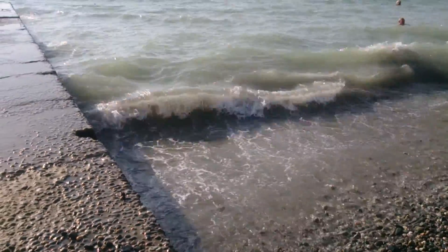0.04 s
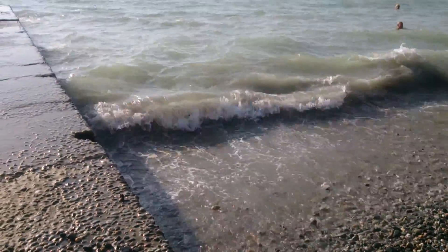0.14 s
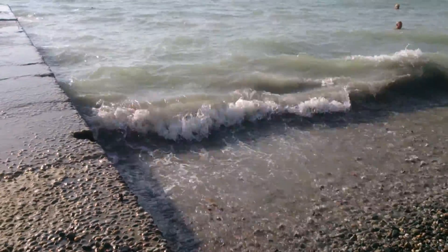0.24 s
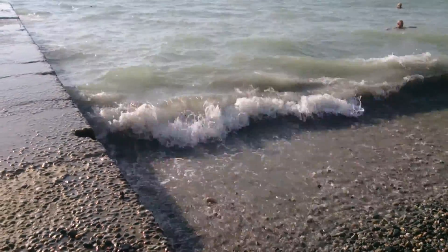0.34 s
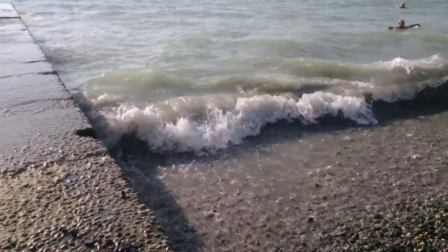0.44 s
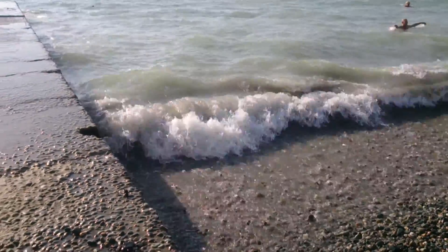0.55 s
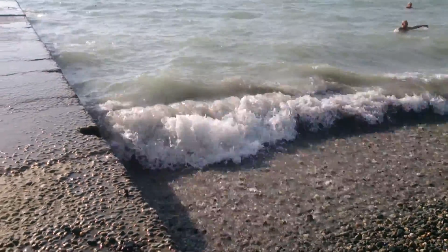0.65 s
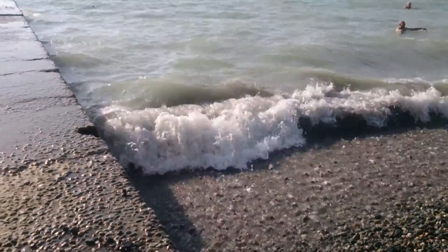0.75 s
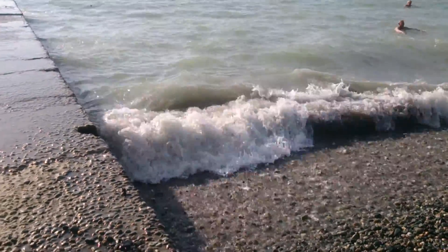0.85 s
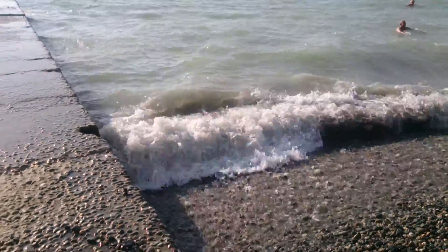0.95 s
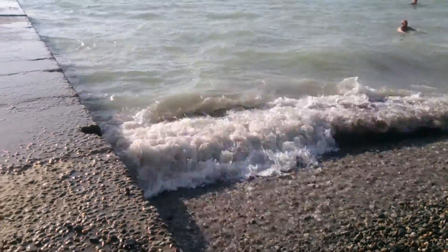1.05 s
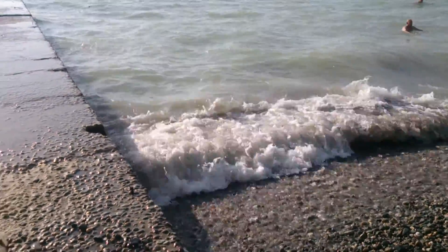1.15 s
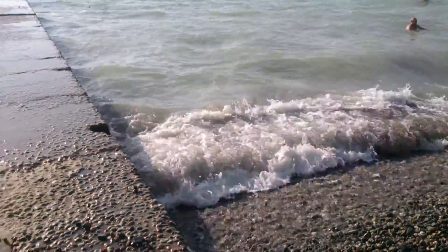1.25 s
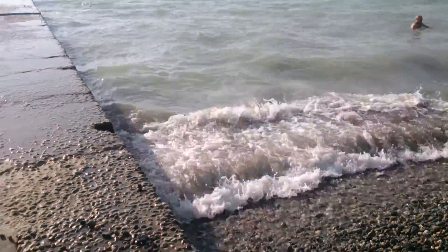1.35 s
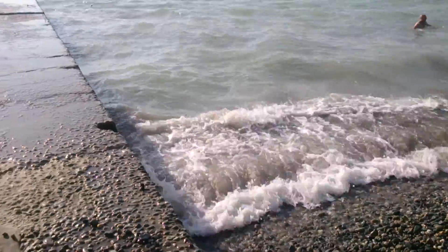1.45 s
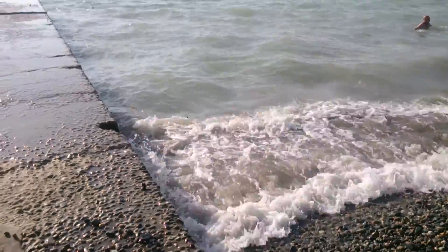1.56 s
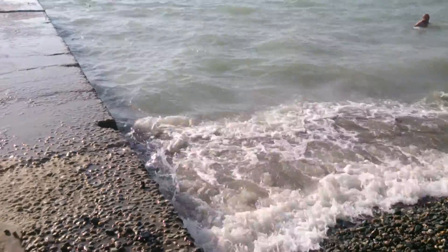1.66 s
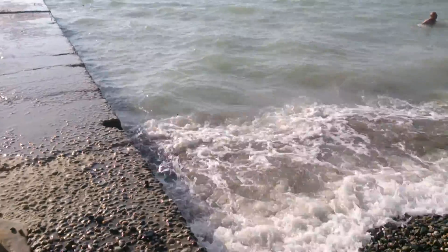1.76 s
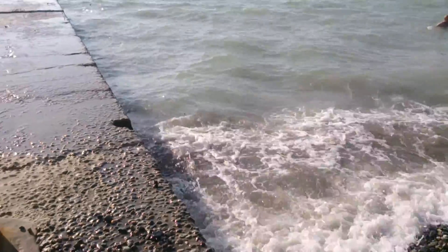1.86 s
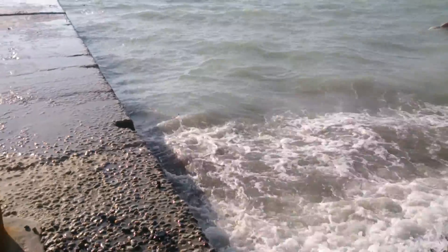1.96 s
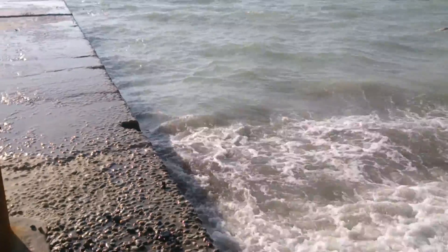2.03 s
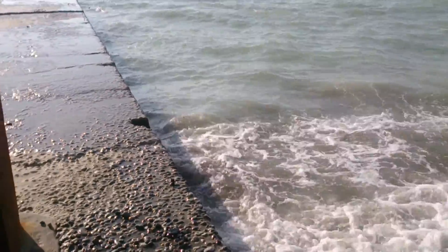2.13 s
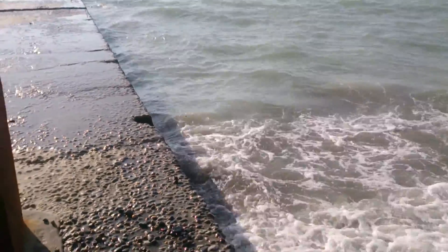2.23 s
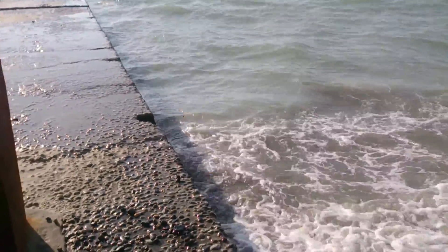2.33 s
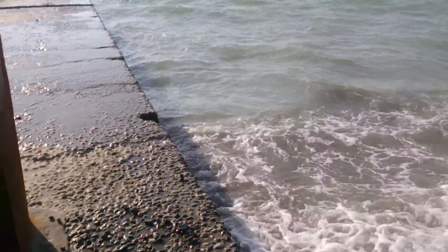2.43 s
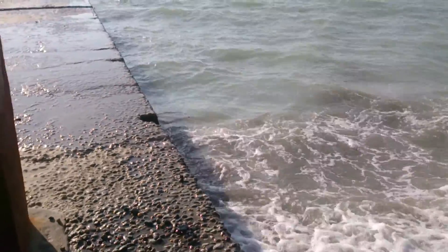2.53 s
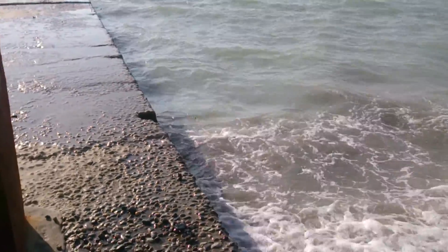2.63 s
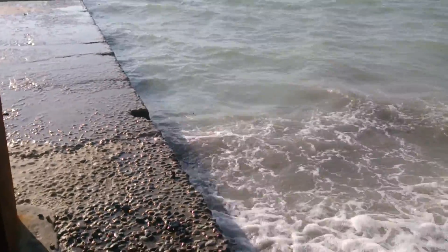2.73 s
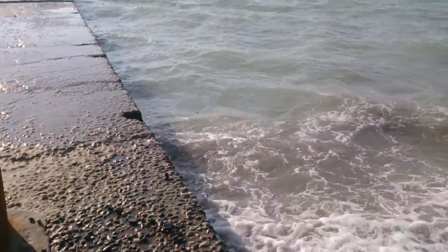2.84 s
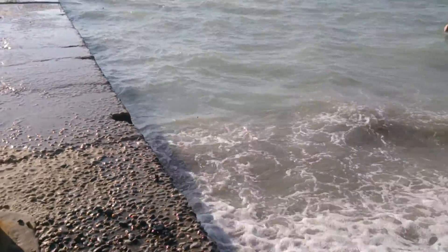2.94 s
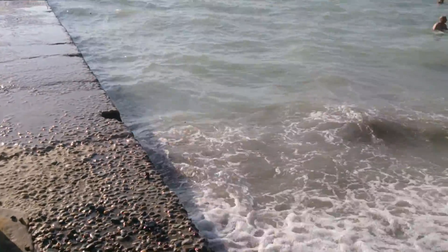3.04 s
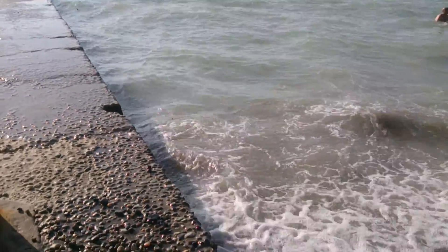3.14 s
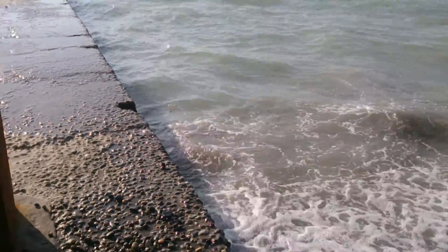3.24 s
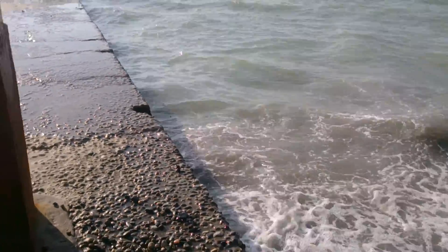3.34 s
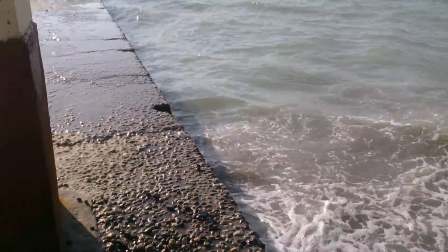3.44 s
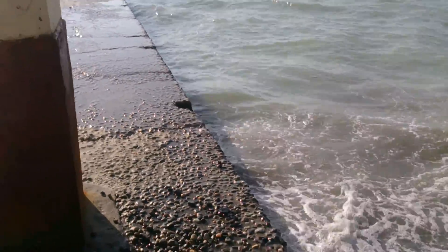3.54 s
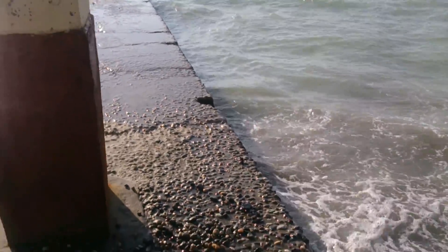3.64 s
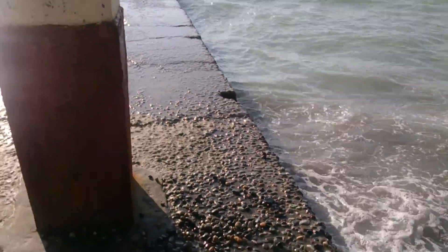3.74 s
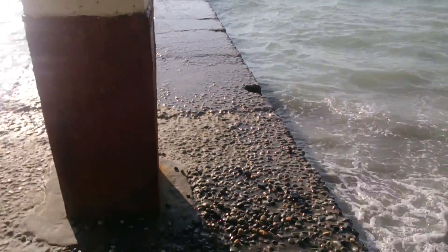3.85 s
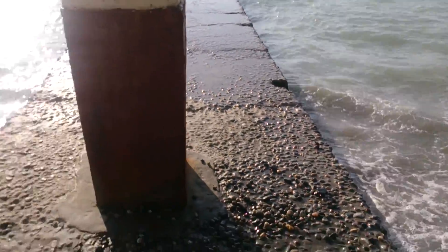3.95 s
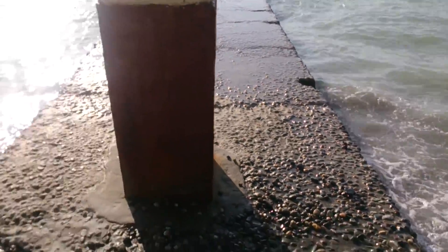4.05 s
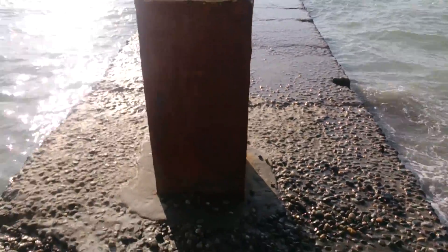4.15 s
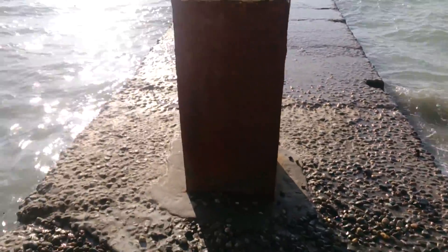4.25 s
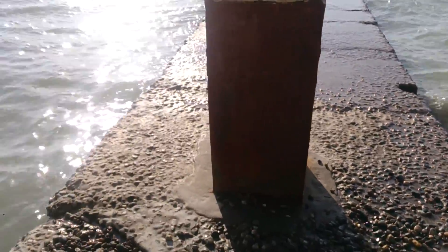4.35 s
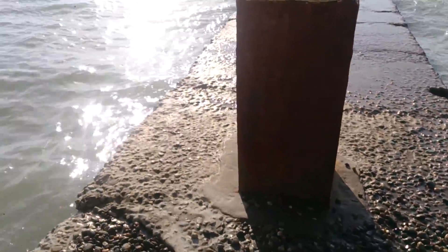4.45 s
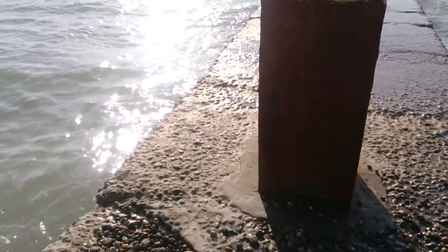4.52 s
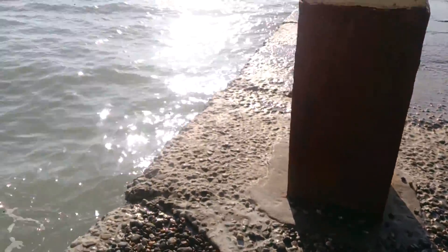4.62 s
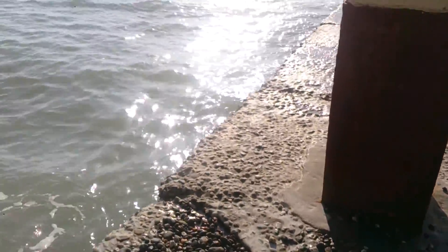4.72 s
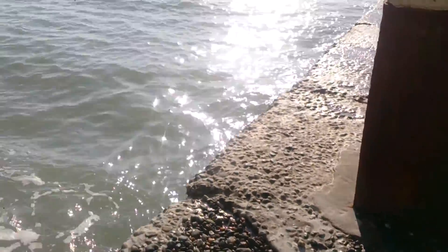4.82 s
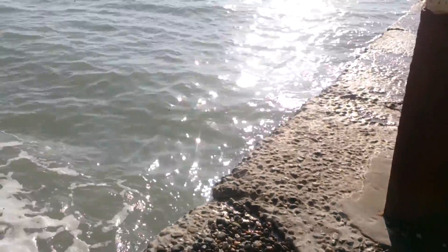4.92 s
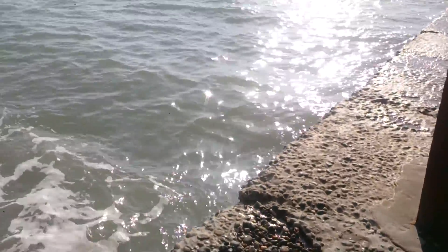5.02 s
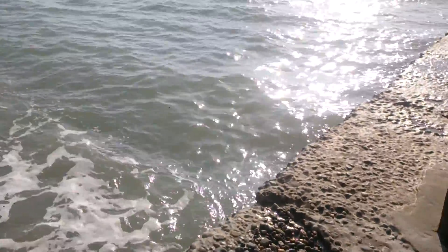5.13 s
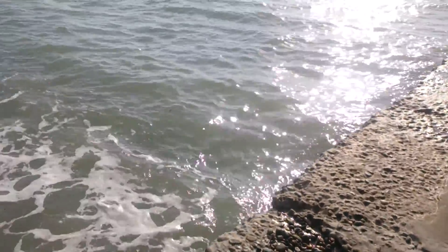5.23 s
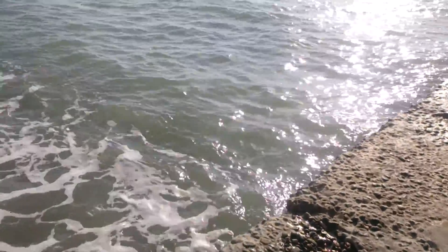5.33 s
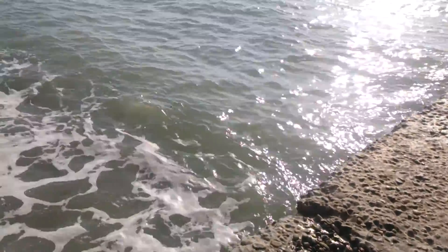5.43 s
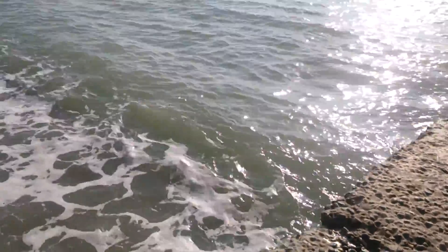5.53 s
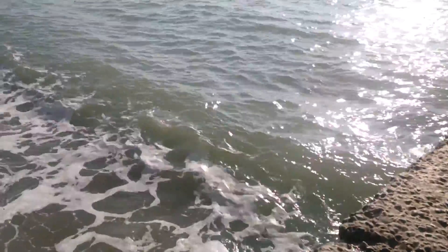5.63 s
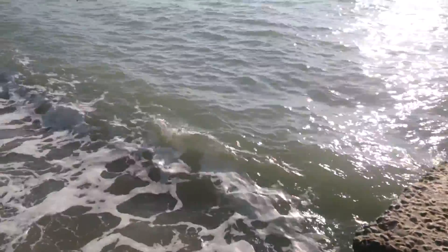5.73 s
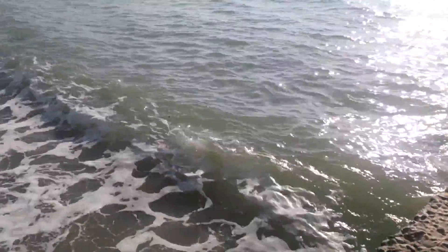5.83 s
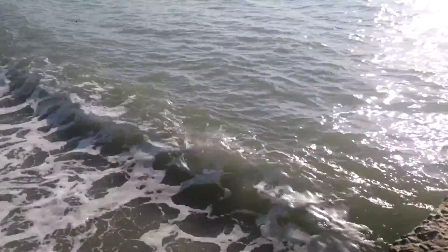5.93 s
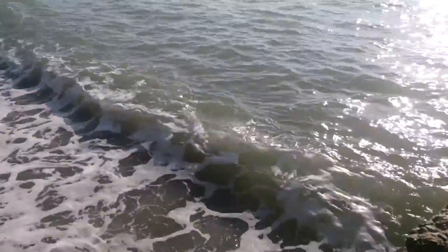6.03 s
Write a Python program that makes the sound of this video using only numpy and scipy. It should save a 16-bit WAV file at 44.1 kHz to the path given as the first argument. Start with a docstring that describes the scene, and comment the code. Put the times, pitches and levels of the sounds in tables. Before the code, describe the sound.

A pebble shore beside a concrete pier, outdoors, in close stereo with wind striking the microphone. From the start a wave rushes in, with low wind thumps in the first 0.3 seconds. Spray patters around 0.8; the falling crest booms dully near 1.2, while white water, grinding shingle and crisp foam stay dense until about 2. Short laps wash up at 2.3 and 2.7, with a brief slackening between. The surf thins to soft fizz and wind rumble. From 3 stones trickle back, and the draining water drags shingle most strongly around 4.0 to 4.2. After 4.4 another wave stirs pebbles; big cobbles rattle evenly from about 5, turning finer and higher after 5.5. A squall hits near 5.05, with fluttering rumble and rapid heavy thumps until 5.4, more buffets and drops around 5.7 to 6.

```python
"""A breaking wave is already rushing up a pebble beach beside a concrete pier, in fizzing foam and gusty wind.
Spray patters on the slab, the backwash drags shingle, then a wave beyond the pier rattles cobbles in a squall.
Water and stones are hails of tiny impacts, coloured and shaped by swells; each grain reaches the two
microphone ports with its own lag. Foam and spray are separate hails on each port.
Wind is coloured noise that follows a pressure curve, with single-eddy pulses that thump on a port."""
import sys
import numpy as np
from scipy import signal
from scipy.fft import rfft, irfft, next_fast_len
from scipy.io import wavfile

SR = 44100
rng = np.random.default_rng(int(sys.argv[2]) if len(sys.argv) > 2 else 0)


def persist_wave(psi):
    """Save psi, clipped to +-1, as 16-bit WAV."""
    counts = np.round(np.clip(psi, -1, 1) * 32767).astype(np.int16)
    wavfile.write(sys.argv[1], SR, np.atleast_2d(counts).T)


N = 268128
TIME = np.arange(N) / SR
SIZE = next_fast_len(N, real=True)
FREQS = np.maximum(np.arange(SIZE // 2 + 1) * SR / SIZE, 1)
SIDES = np.array([[1], [-1]])  # left, right: times half a pan in dB


def undb(db):
    """Decibels to gain."""
    return 10 ** (np.asarray(db) / 20)


def unit(x):
    """Scale to rms 1."""
    return x / np.sqrt(np.mean(x ** 2))


def curves(table):
    """The columns of a table, joined by straight lines in time."""
    s, *columns = np.transpose(table)
    return [np.interp(TIME, s, column) for column in columns]


def response(points):
    """Gain at every frequency from points of f/Hz, level/dB."""
    hz, db = np.transpose(points)
    return undb(np.interp(np.log(FREQS), np.log(hz), db))


def colour(x, points):
    """Give x a spectrum that falls 12 dB an octave past its end points; rms 1."""
    low_hz, high_hz = points[0][0], points[-1][0]
    skirts = np.minimum(1, np.minimum(FREQS / low_hz, high_hz / FREQS)) ** 2
    spectrum = rfft(x, SIZE) * response(points) * skirts
    return unit(irfft(spectrum, SIZE)[:, :N])


def walk(rate):
    """Random curve that takes a new value rate times a second, joined by straight lines; rms 1."""
    steps = rng.uniform(-1, 1, 4096)
    return unit(np.interp(TIME * rate, np.arange(len(steps)), steps))


def swell(full_s, db, attack_s, hold_s, release_s):
    """Gain of a body of water or air that gathers, holds its strength and dies away."""
    early = np.maximum(full_s - TIME, 0)
    late = np.maximum(TIME - full_s - hold_s, 0)
    return undb(db) * np.exp(-early / attack_s - late / release_s)


def puff(s, half_s, db):
    """Gain of a short, rounded surge."""
    return undb(db) * np.exp(-((TIME - s) / half_s) ** 2 / 2)


def together(*gains):
    """Unrelated surges add in power."""
    return np.sqrt(sum(gain ** 2 for gain in gains))


def grains(scatter_db):
    """A dense hail of tiny impacts: most are faint, a few stand out."""
    spread = np.minimum(rng.exponential(size=N), 4)
    return unit(rng.uniform(-1.07, 1, N) * undb(min(scatter_db, 6) * spread))


def front(points, lag_ms, spread_ms, scatter_db, surge_db, surge_rate, pan_db=0, diffuse_db=-10, count=2):
    """Stretches of a wave front surge on their own; each grain reaches the ports from its own bearing."""
    ports = np.zeros((2, N))
    for _ in range(count):
        hits = grains(scatter_db) * undb(surge_db * walk(surge_rate))
        # lag of the left port behind the right, in samples
        lag = (lag_ms + spread_ms * rng.standard_normal(N)) * SR / 1000
        arrival = np.rint(np.arange(N) + lag).astype(int) % N
        left = np.bincount(arrival, hits, N)
        ports += [left, hits]
    # pier and beach scatter a share of it from all sides
    scattered = undb(diffuse_db) * rng.standard_normal((2, N))
    return colour(unit(ports) + scattered, points) * undb(SIDES * pan_db / 2)


# Swells of the near wave: falling crest (plunge), thrown shingle, spreading foam, white water (churn).
# Each gives full_s [s], db [dB], attack_s, hold_s, release_s [s].
WAVE = dict(plunge=dict(full_s=1.21, db=-28.5, attack_s=1.23, hold_s=0.21, release_s=0.93),
        shingle=dict(full_s=0.46, db=-25.5, attack_s=4.7, hold_s=1.62, release_s=0.37),
        foam=dict(full_s=0.59, db=-24, attack_s=0.6, hold_s=1.26, release_s=0.81),
        churn=dict(full_s=1.69, db=-29.5, attack_s=0.88, hold_s=1.25, release_s=0.52))
# Bearing of the wave front: t/s, lag of the left port behind the right/ms, spread of lags/ms
FRONT = [(0.0, -0.16, 0.11), (1.0, -0.11, 0.1), (1.8, -0.16, 0.17), (2.35, -0.24, 0.083), (2.8, -0.18, .04),
         (3.5, -0.2, 0.06)]
# Last tongues of water lapping up the beach: t/s, half length/s, churn, shingle and foam level/dB
LAPS = [(2.327, 0.08, -28.5, -34, -28), (2.713, 0.22, -33.5, -50, -27)]
# The water slackens between the laps: s, half_s [s]; db [dB] is the share of gain that falls silent
LULL = dict(s=2.544, half_s=.06, db=-10)
# Colour of air trapped under the falling crest: f/Hz, level/dB per Hz
PLUNGE = [(60.0, -6.5), (140.0, -0.9), (300.0, -2), (400.0, -3.0), (530.0, -16), (820.0, -4.5),
          (1200.0, -7), (2500.0, -75)]
# Colour of tumbling white water, in every wave: f/Hz, level/dB per Hz
CHURN = [(60.0, 2), (160.0, -2), (330.0, -0.3), (600.0, -2), (950.0, -1.9), (1600.0, -7.5), (3000.0, -13.5),
         (8000.0, -24)]
# Colour of small stones, in both waves: f/Hz, level/dB per Hz
SHINGLE = [(600.0, -10.5), (1600.0, -2.5), (2600.0, -2), (4000.0, -1), (5500.0, -2.5), (8000.0, -7),
           (15000.0, -29)]


def near_wave(start_pan_db=1.5, drift_db_per_s=-1.2, stall_s=3.46, stall_release_s=0.27):
    """The crest falls and traps air, white water tumbles up the beach and throws the shingle about."""
    lag, spread = curves(FRONT)
    churn_laps = (puff(s, half_s, db) for s, half_s, db, _, _ in LAPS)
    shingle_laps = (puff(s, half_s, db) for s, half_s, _, db, _ in LAPS)
    tumbling = together(swell(**WAVE["churn"]), *churn_laps)
    rolling = together(swell(**WAVE["shingle"]), *shingle_laps)

    plunge = swell(**WAVE["plunge"]) * front(
        PLUNGE, lag, spread, scatter_db=7.0, surge_db=2.0, surge_rate=34, diffuse_db=-15)
    churn = tumbling * front(
        CHURN, lag, spread, scatter_db=4, surge_db=2.0, surge_rate=26, diffuse_db=-12)
    shingle = rolling * front(
        SHINGLE, lag, spread, scatter_db=4.0, surge_db=1.1, surge_rate=28, diffuse_db=-10.5,
        pan_db=start_pan_db + drift_db_per_s * TIME)

    # the run-up comes to rest
    running = np.exp(-np.maximum(TIME - stall_s, 0) / stall_release_s)
    return running * (1 - puff(**LULL)) * (plunge + churn + shingle)


# Colour of bursting foam bubbles: f/Hz, level/dB per Hz
FOAM = [(1500.0, -10), (4000.0, -5.5), (7500.0, -5), (11000.0, 1.5), (13000.0, -3), (15500.0, -7.5)]
# Pans are left minus right; fresh foam drifts to the right, spent foam fizzes all the time
FOAM_PAN_DB, FOAM_DRIFT_DB_PER_S = 9.5, -2.9
OLD_FOAM_DB, OLD_FOAM_PAN_DB = -34, 3.5
LAP_PAN_DB = -2.5


def foam():
    """Countless small bubbles burst all around, in soft surges; the wave and each lap bring fresh foam."""
    fresh_pan_db = FOAM_PAN_DB + FOAM_DRIFT_DB_PER_S * TIME
    fresh = swell(**WAVE["foam"]) * undb(SIDES * fresh_pan_db / 2)
    lapping = (puff(s, half_s, db + SIDES * LAP_PAN_DB / 2) for s, half_s, _, _, db in LAPS)
    spent = undb(OLD_FOAM_DB + SIDES * OLD_FOAM_PAN_DB / 2)
    pops = np.array([grains(scatter_db=4.0) for _ in range(2)])
    surges_db = 0.5 * walk(rate=26)
    return colour(pops, FOAM) * together(fresh, spent, *lapping) * undb(surges_db)


# Swell of the squall: full_s [s], db [dB], attack_s, hold_s, release_s [s]
SQUALL = dict(full_s=5.056, db=-26, attack_s=0.19, hold_s=0.32, release_s=3.3)
# Gusts: t/s, half length/s, level/dB, port (0 left, 1 right)
GUSTS = [(0.024, .05, -23, 1), (0.237, 0.074, -24.5, 1), (0.606, 0.073, -28, 1), (1.0, 0.18, -25, 1),
         (1.353, 0.092, -27, 1), (1.98, .15, -27.5, 1), (2.525, .06, -25.5, 1), (3.5, 0.29, -32, 1),
         (4.155, 0.032, -31, 0), (5.052, .06, -25, 1), (5.347, 0.024, -25, 0), (5.98, 0.042, -21.5, 1)]
# A steady breeze, stronger on the right port; pan is left minus right
BREEZE_DB, BREEZE_PAN_DB = -34.5, -4


def wind_pressure(squall_pan_db=1.6):
    """Pressure in dB on each port: breeze, squall and the gusts that catch it add in power."""
    breeze = undb(BREEZE_DB + SIDES * BREEZE_PAN_DB / 2)
    squall = swell(**SQUALL) * undb(SIDES * squall_pan_db / 2)
    pressure = together(breeze, squall)
    for s, half_s, db, port in GUSTS:
        side = int(port > .5)
        pressure[side] = together(pressure[side], puff(s, half_s, db))
    return 20 * np.log10(pressure)


# Colour of large slow eddies: f/Hz, level/dB per Hz
RUMBLE = [(20.0, 2.5), (55.0, -0.5), (110.0, -9), (220.0, -33), (500.0, -52), (1500.0, -65.6)]
# Colour of small fast eddies: f/Hz, level/dB per Hz
FLUTTER = [(60, -4.5), (170, 1.5), (300, -7), (500, -21), (1000, -18), (3000, -40)]


def wind(stiff_db=-25, flutter_db=-32, growth=1.72):
    """Each port has its own turbulence; small eddies grow faster than large ones as a gust stiffens."""
    pressure_db = wind_pressure()
    eddies_db = 1.8 * np.array([walk(rate=20) for _ in range(2)])
    rumble = colour(rng.standard_normal((2, N)), RUMBLE) * undb(pressure_db + eddies_db)

    bursts_db = 3.8 * np.array([walk(rate=55) for _ in range(2)])
    # growth is dB of flutter per dB of pressure
    strength_db = flutter_db + growth * (pressure_db - stiff_db)
    flutter = colour(rng.standard_normal((2, N)), FLUTTER) * undb(strength_db + bursts_db)
    # the left port is the more exposed to small eddies
    return rumble + flutter * undb(SIDES * 4.5)


# Eddies that hit a port: t/s, level/dB before the push gain, f/Hz that sets the pulse speed,
# port (0 left, 1 right)
THUMPS = [(0.042, -22, 130, 1), (.2, -17, 120, 1), (.269, -19, 130, 1), (1.509, -17, 160, 1),
          (3.351, -18.5, 109, 1), (3.561, -16.5, 240.4, 1), (3.683, -19, 100, 1), (3.72, -20.5, 190, 1),
          (5.04, -15, 450, 0), (5.069, -15, 420, 0), (5.09, -13, 130, 1), (5.128, -10, 238, 0),
          (5.2537, -10, 210, 0), (5.312, -13, 328, 0), (5.333, -12, 240, 0), (5.353, -11.5, 110, 0),
          (5.373, -12.5, 140, 0), (5.426, -19, 300, 0), (5.734, -14, 247, 0), (5.78, -14.5, 328, 0),
          (5.929, -18.5, 300, 0), (5.994, -23, 130, 1)]


def thumps(push_db=2.0):
    """A single eddy sucks at a port, then pushes on it."""
    out = np.zeros((2, N))
    for s, db, hz, port in THUMPS:
        age = 2 * np.pi * hz * (TIME - s)
        pulse = 2 * age / (1 + age ** 2 / 2) ** 2
        out[int(port > .5)] += undb(db) * pulse
    # the push is the stronger half
    return np.where(out > 0, out * undb(push_db), out)


# Spray landing on the concrete: t/s at its height, half length/s, level/dB
SPRAY = [(.82, 0.12, -29), (4.074, .035, -38), (4.305, 0.0046, -30), (4.58, .005, -41), (5.264, 0.014, -41),
         (5.695, 0.014, -27.5), (5.92, 0.011, -30)]
# Colour of drops on concrete: f/Hz, level/dB per Hz
DROPS = [(3000, -12), (8000, 7), (15000, -3)]


def spray():
    """Handfuls of drops patter on the slab, each a short puff of tiny impacts."""
    shower = sum(puff(s, half_s, db) for s, half_s, db in SPRAY)
    drops = np.array([grains(scatter_db=5.5) for _ in range(2)])
    return shower * colour(drops, DROPS)


# Swells of draining water (churn) and rolling small stones (shingle):
# full_s [s], db [dB], attack_s, hold_s, release_s [s]
BACKWASH = dict(churn=dict(full_s=4.04, db=-37, attack_s=1.8, hold_s=0.39, release_s=1),
            shingle=dict(full_s=4.02, db=-29, attack_s=0.38, hold_s=0.17, release_s=0.31))
# Colour of small stones dulled by a sheet of water: f/Hz, level/dB per Hz
DRAGGED = [(700, -17), (1600, -5), (2700, -3), (4200, -1), (5500, -6), (7500, -12), (15000, -39)]


def backwash(lag_ms=0.19, spread_ms=.06, drains_s=2.97, attack_s=0.2):
    """Water drains down the slope and rolls the small stones with it."""
    churn = swell(**BACKWASH["churn"]) * front(
        CHURN, lag_ms, spread_ms, scatter_db=5, surge_db=0.5, surge_rate=15, diffuse_db=-11.5)
    # a few stones trickle back before the whole bed moves
    trickle = puff(s=3.1, half_s=0.49, db=-41)
    rolling = together(swell(**BACKWASH["shingle"]), trickle)
    shingle = rolling * front(
        DRAGGED, lag_ms, spread_ms, scatter_db=4.5, surge_db=1.3, surge_rate=28, pan_db=3.0,
        diffuse_db=-13)
    draining = np.exp(-np.maximum(drains_s - TIME, 0) / attack_s)
    return draining * (churn + shingle)


# Swells beyond the pier: white water (churn), cobbles, stirred shingle and the sliding bed (slide).
# Each gives full_s [s], db [dB], attack_s, hold_s, release_s [s].
FAR_WAVE = dict(churn=dict(full_s=4.89, db=-33.5, attack_s=0.6, hold_s=0.33, release_s=0.08),
            cobbles=dict(full_s=5.33, db=-25.5, attack_s=0.64, hold_s=0.33, release_s=1.0),
            shingle=dict(full_s=4.46, db=-30.5, attack_s=0.86, hold_s=.15, release_s=1.8),
            slide=dict(full_s=5.6, db=-29.5, attack_s=0.34, hold_s=0.52, release_s=1.0))
# Colour of large stones: f/Hz, level/dB per Hz
COBBLES = [(500.0, -38), (1000.0, 1), (1400.0, 1.5), (1850.0, 3), (2600.0, -1.5), (4500.0, -19),
           (10000.0, -31)]
FAR_HEARD_S, FAR_ATTACK_S = 4.47, 0.19  # it comes into earshot as the listener turns


def far_wave(lag_ms=-.37, spread_ms=.07, fine_ratio=1.38, fine_s=5.57, fine_length_s=0.17):
    """Beyond the pier a wave stirs the shingle; big cobbles rattle, giving way to smaller ones."""
    churn = swell(**FAR_WAVE["churn"]) * front(
        CHURN, lag_ms, spread_ms, scatter_db=1.5, surge_db=1.1, surge_rate=28, pan_db=0.0)

    def rattle(ratio):
        """Smaller stones ring higher; so many roll at once that their rattle stays even."""
        return front(
            np.array(COBBLES) * [ratio, 1], lag_ms, spread_ms, scatter_db=3.0, surge_db=1.3,
            surge_rate=50, pan_db=-1.0, diffuse_db=-7.5)

    coarse, fine = rattle(1), rattle(fine_ratio)
    fine_share = 1 / (1 + np.exp((fine_s - TIME) / fine_length_s))
    mixed = np.sqrt(1 - fine_share) * coarse + np.sqrt(fine_share) * fine
    cobbles = swell(**FAR_WAVE["cobbles"]) * mixed

    rolling = together(swell(**FAR_WAVE["shingle"]), swell(**FAR_WAVE["slide"]))
    shingle = rolling * front(
        SHINGLE, lag_ms, spread_ms, scatter_db=4.0, surge_db=2.1, surge_rate=48, pan_db=1.0,
        diffuse_db=-4.5)
    in_earshot = np.exp(-np.maximum(FAR_HEARD_S - TIME, 0) / FAR_ATTACK_S)
    return in_earshot * (churn + cobbles + shingle)


# Difference in colour of the two ports: f/Hz, left minus right level/dB
PORTS = [(200.0, -3.5), (650.0, 0.4), (1500.0, -2.1), (3000.0, -0.5), (5000.0, -2), (9500.0, -1.5),
         (11000.0, -5), (12500.0, -14.5), (15500.0, -12.5)]


def scene():
    """The surf passes through the two ports; the wind acts on them directly."""
    surf = near_wave() + foam() + spray() + backwash() + far_wave()
    # each port takes half of the difference
    port_gain = response(PORTS) ** (SIDES / 2)
    heard = irfft(rfft(surf, SIZE) * port_gain, SIZE)[:, :N]
    return heard + wind() + thumps()


def record(dry, top_hz=15900):
    """A steep elliptic low-pass cuts the top: 0.1 dB ripple below, 80 dB down above."""
    low_pass = signal.ellip(12, .1, 80, top_hz, fs=SR, output="sos")
    return signal.sosfilt(low_pass, dry)


dry = scene()
out = record(dry)
persist_wave(out)
```